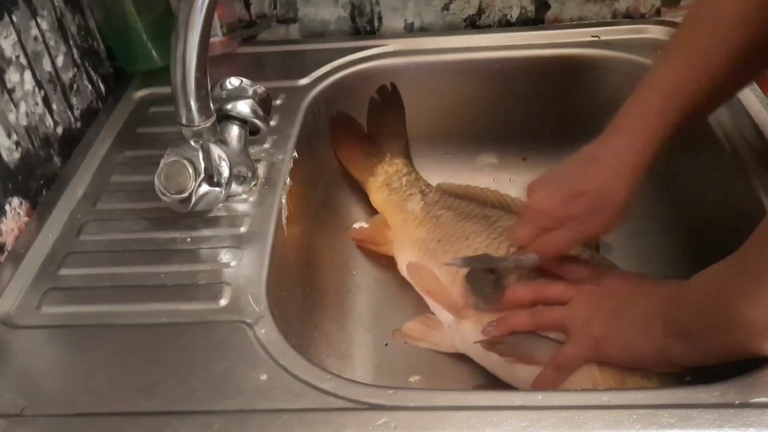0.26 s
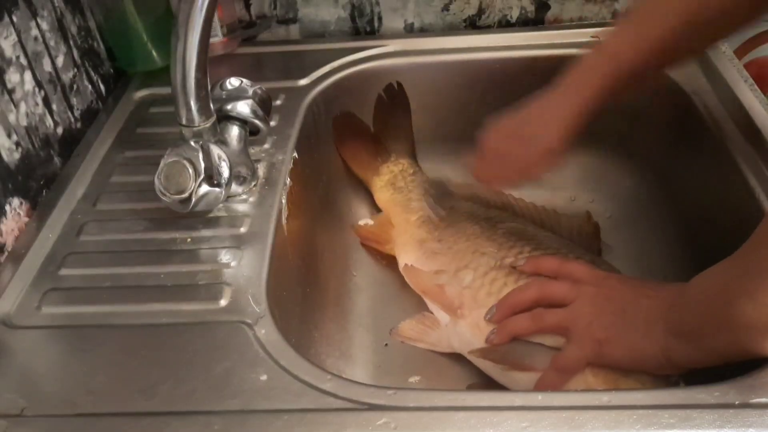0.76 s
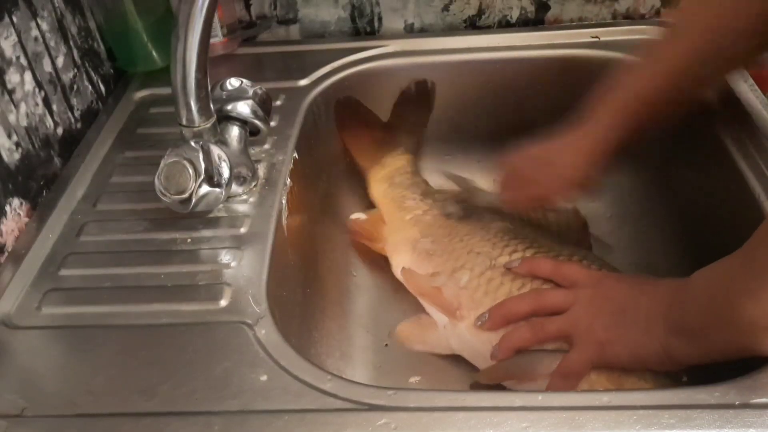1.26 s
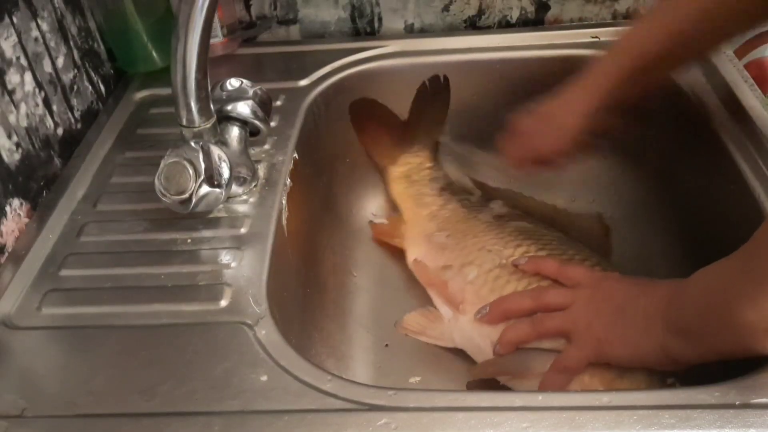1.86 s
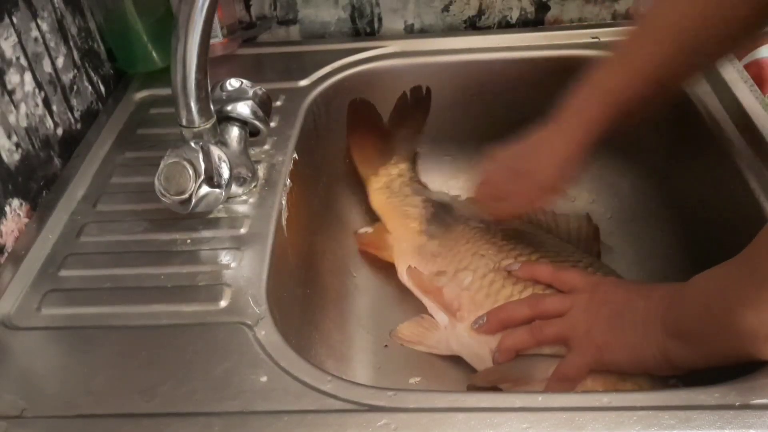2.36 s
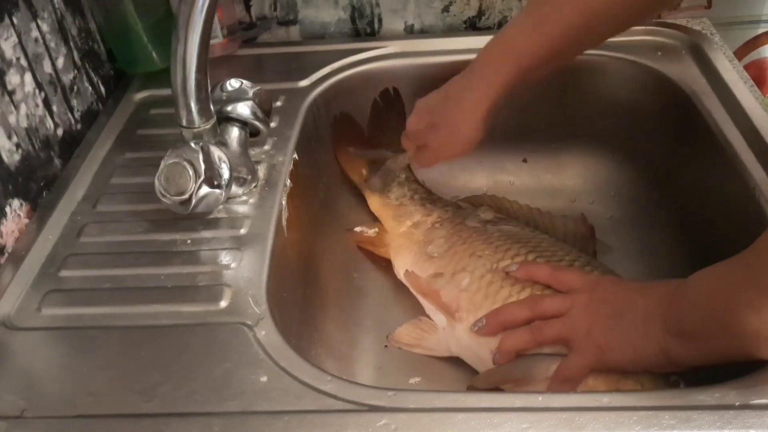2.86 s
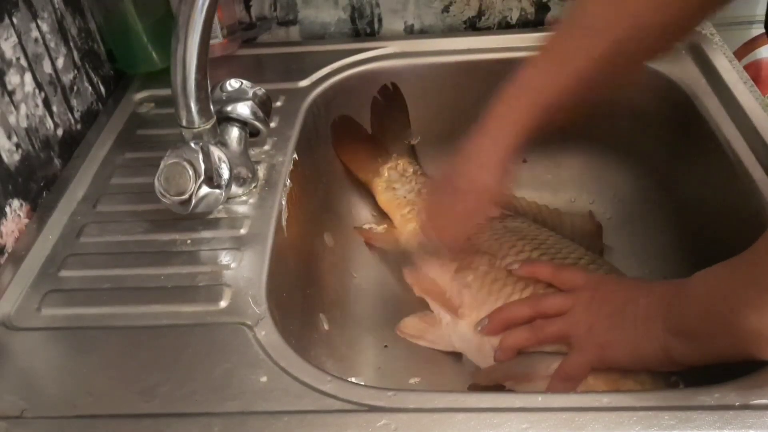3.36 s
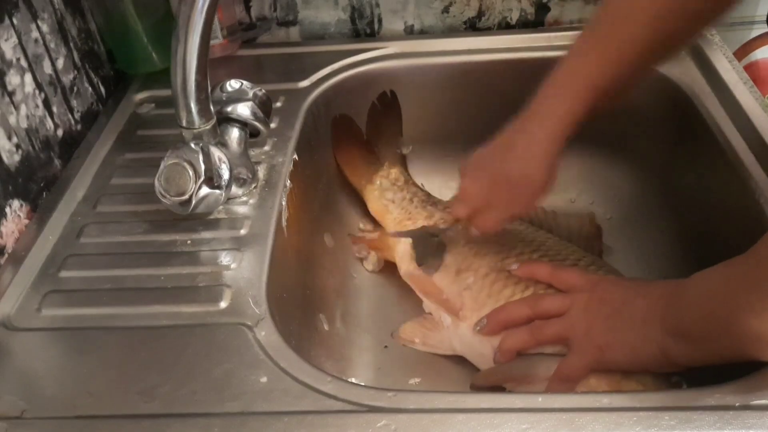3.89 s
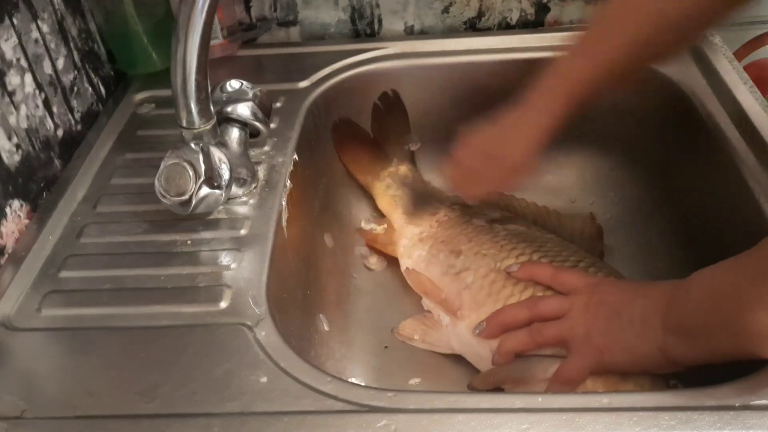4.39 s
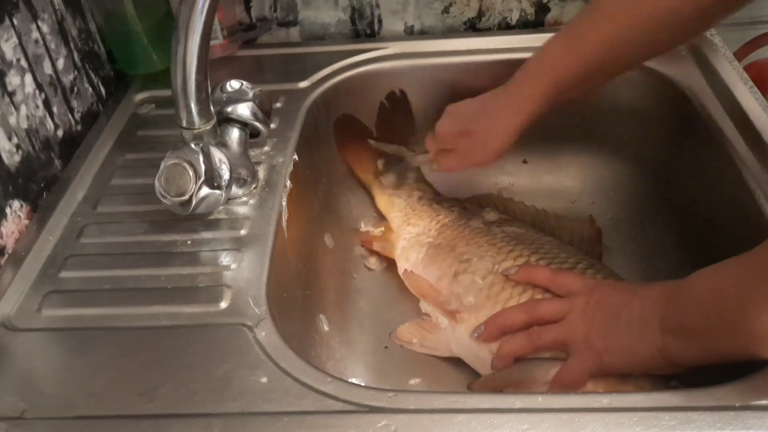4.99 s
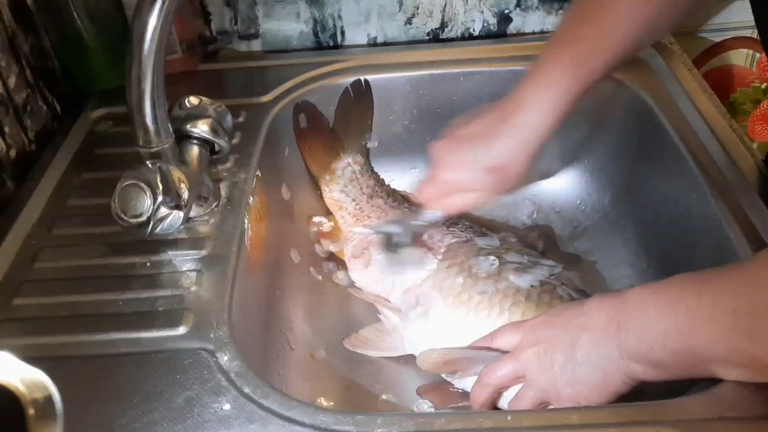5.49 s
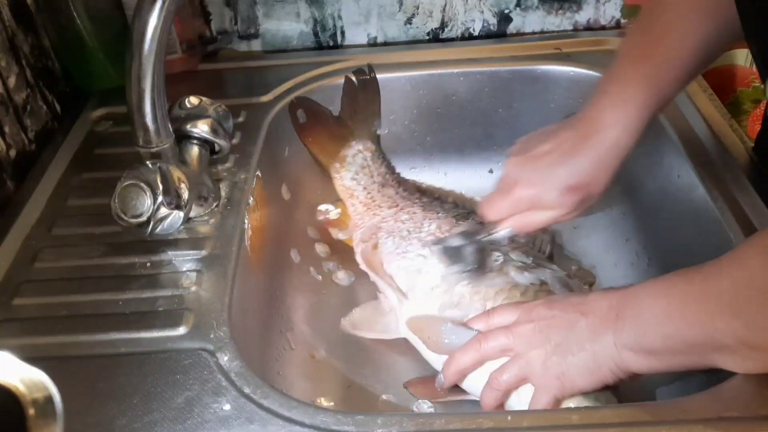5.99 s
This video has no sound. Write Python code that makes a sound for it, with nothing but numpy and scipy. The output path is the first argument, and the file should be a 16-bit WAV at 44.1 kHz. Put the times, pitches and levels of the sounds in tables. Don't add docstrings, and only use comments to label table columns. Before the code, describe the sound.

A blade rasps scales off a fish in a steel sink, about three crisp strokes a second, the basin thudding softly beneath each push.

```python
import sys
import numpy as np
from scipy import signal
from scipy.fft import rfft, irfft, next_fast_len
from scipy.io import wavfile
from scipy.ndimage import uniform_filter1d

SR = 44100
rng = np.random.default_rng(int(sys.argv[2]) if len(sys.argv) > 2 else 0)


def materialize(psi):
    bounded = np.clip(np.atleast_2d(psi).T, -1, 1)
    quanta = np.round(bounded * 32767).astype(np.int16)
    wavfile.write(sys.argv[1], SR, quanta)


def ratio(d):
    e = np.asarray(d, float) / 20
    return 10 ** e


N = 275625
TIME = np.arange(N) / SR
QUIETER_FROM_S = 5.8
QUIETER_DB = -4.5

# bite_s, drag_s, rasp_db at the end of the drag, rub_db of the fish, close_in_s
STROKES = [(0.136, 0.11, -29.5, -38.5, 0.045), (0.519, 0.14, -26, -37.5, 0.034),
           (0.885, 0.081, -28.5, -42, 0.03), (1.246, 0.068, -26.5, -40.5, 0.03),
           (1.603, 0.056, -30, -44, 0.051), (2.015, 0.045, -24, -33.5, 0.14),
           (2.34, 0.076, -25.5, -42.5, 0.042), (2.632, 0.098, -28.5, -44, 0.022),
           (2.937, 0.069, -25, -37.5, 0.048), (3.2, 0.061, -25, -37.5, 0.021),
           (3.52, 0.063, -23.5, -34.5, 0.044), (3.795, 0.082, -26, -37.5, 0.02),
           (4.105, 0.074, -23.5, -36, 0.033), (4.41, 0.075, -24, -34.5, 0.038),
           (4.708, 0.1, -24.5, -36, 0.012), (5.085, 0.061, -23.5, -33.5, 0.084),
           (5.605, 0.073, -27.5, -36.5, 0.034), (5.939, 0.1, -30, -44, 0.062)]
# start_s,
# rasp_db, rub_db, close_in_s
BRUSHES = [(0.0, -38.5, -43, .02), (0.327, -40, -44.5, 0.085), (1.03, -35, -37, 0.057),
           (1.119, -39.5, -44, 0.082), (1.53, -50, -48, 0.061), (1.75, -47, -47.5, 0.082),
           (1.926, -27, -56, 0.0052), (2.099, -28.5, -39, 0.11), (5.009, -52, -40.5, 0.022),
           (5.245, -61, -60, 0.051), (0.257, -36, -37, .06), (0.727, -40.5, -56, 0.037),
           (1.5, -49, -51, 0.13), (2.455, -36.5, -58, 0.09), (2.592, -51, -63, 0.035),
           (3.469, -47, -60, .01), (3.614, -35, -37.5, 0.047), (3.76, -56, -66, 0.013),
           (3.92, -33.5, -45, 0.055), (4.57, -50.5, -50, .06), (5.195, -38.5, -64, 0.058),
           (5.87, -52, -45, .04), (6.144, -46.5, -60, .06), (0.862, -46, -60, .012), (1.34, -36, -50, .03),
           (5.557, -52, -64, .02), (4.051, -45.5, -66, 0.013), (0.052, -43.5, -63, 0.03),
           (0.46, -54.5, -66, 0.048), (4.665, -50, -49, .015), (5.407, -36.5, -43, 0.042),
           (5.789, -44.5, -41.5, 0.064)]
# time_s, hiss_db
DAMP = [(0.1, -75), (0.42, -70), (0.83, -65), (1.2, -58), (1.44, -58), (1.87, -62), (2.26, -62),
        (2.56, -75), (2.87, -68), (3.13, -60), (3.43, -65), (3.74, -68), (4.03, -71), (4.35, -65),
        (4.63, -73), (4.97, -66), (5.31, -78), (5.54, -56.5), (5.85, -58), (6.2, -64)]
# time_s, blade_ring_db re rasp
GRIP = [(0.2, -21), (0.65, -6.5), (0.93, -6), (1.28, -13), (1.63, -9.5), (2.05, -8.5), (2.39, -11.5),
        (2.72, -6), (2.98, -11), (3.24, -6), (3.56, -9.5), (3.85, -5), (4.16, -10), (4.45, -8), (4.8, -5),
        (5.12, -7.5), (5.41, -3), (5.52, -3), (5.65, 2.5), (5.94, 1), (6.08, -7)]


def stroke_levels():
    moves = list(STROKES) + [(s, 0, db, rub_db, close) for s, db, rub_db, close in BRUSHES]
    edge = [(s, drag, db, close) for s, drag, db, _, close in moves]
    rub = [(s, drag, rub_db, close) for s, drag, _, rub_db, close in moves]
    damp_db = np.interp(TIME, *np.transpose(DAMP))
    rub_rest_db = -58 + QUIETER_DB * (TIME > QUIETER_FROM_S)
    rasp_db = effort(edge, bite_db=-7, release_db_s=263, rest_db=damp_db)
    ring_db = effort(edge, bite_db=-10, release_db_s=340, rest_db=-74)
    ring_db = ring_db + np.interp(TIME, *np.transpose(GRIP))
    body_db = effort(rub, bite_db=-2.5, release_db_s=140, rest_db=rub_rest_db)
    return rasp_db, ring_db, body_db


def effort(events, bite_db, release_db_s, rest_db):
    step = 16
    close_in_db, lift_db, lift_s = -30, -6.5, 0.0063
    t, power = TIME[::step], 0
    for s, drag, db, close in events:
        since_lift = t - s - drag
        before = bite_db * (drag > 0) + close_in_db * (s - t) / close
        during = -bite_db * since_lift / max(drag, 1e-6)
        after = -release_db_s * since_lift + lift_db * np.clip(since_lift / lift_s, 0, 1)
        shape = np.where(t < s, before, np.where(since_lift < 0, during, after))
        power = power + ratio(2 * np.maximum(db + shape, -200))
    return 10 * np.log10(np.interp(TIME, t, power) + ratio(2 * rest_db))


# freq_hz, density_db per Hz
RASP = [(350, -47), (600, -23.5), (849, -0.5), (1030, -23), (1170, -10), (2000, -9.5), (2800, -3.5),
        (3350, -1), (6610, -0.5), (9480, -1.5), (14000, -2), (15800, -1), (16500, -43)]
# freq_hz, width_hz, level_db
BLADE = [(2400, 700, -4), (2880, 163, 8.5)]
# time_s, share_db, tilt_db
ANGLE = [(0.2, -2.5, 0.1), (0.6, -6, 5), (0.93, 1, -0.5), (1.28, 0, -3), (1.63, -5, -0.5), (2.05, -2, -3),
         (2.39, -1.1, -3), (2.69, 0, 3), (2.98, -6, -1), (3.24, 0, -0.5), (3.56, -8, 3), (3.85, -4, 0.6),
         (4.15, -3, 1), (4.45, -4.8, -3), (4.77, -1, -0.7), (5.12, -2.5, -3), (5.65, -5.5, -2.3),
         (6.0, 0.5, -0.3)]
# freq_hz, width_hz
SHEEN = [(5600, 3800), (13000, 3400)]
# time_s, level_db re rasp
DIG = [(0.2, -10.5), (0.62, -13), (0.95, -10), (1.28, -14.5), (1.63, -16.5), (2.05, -11), (2.4, -13),
       (2.7, -11), (2.98, -13.5), (3.24, -15), (3.56, -17), (3.85, -19), (4.15, -17.5), (4.46, -12),
       (4.78, -10), (5.12, -6.5), (5.65, -12), (6.0, -13.5)]


def rasp(rasp_db, blade_db):
    beat = (clicks(500, 0.97, 0.0021) + 2.3) * (clicks(90, 3.5, 0.004) + 2.5)
    grit = level(pair((N,), 0.062) * beat, -1.4)
    noise = pair((N,), 0.036)

    flecks = 0
    for hz in np.geomspace(1300, 14000, num=11):
        patches = (clicks(30, 5.2, 0.0073) + 0.46) * ratio(2.4 * walk(25))
        flecks = flecks + ring(noise * patches, [(hz, hz / 2.3, 0)]) / np.sqrt(hz)

    sheen = 0
    s, share_db, tilt_db = np.transpose(ANGLE)
    for sign, (hz, width) in zip((-1, 1), SHEEN):
        swell = ratio(np.interp(TIME, s, share_db + sign * tilt_db) + 2 * walk(30))
        band = [(hz, width, 0)]
        hiss = ring(ring(pair((N,), 0.1) * beat, band), band)
        sheen = sheen + swell * level(hiss, -8)

    dig = ratio(np.interp(TIME, *np.transpose(DIG))) * level(ring(noise * beat, [(1580, 1870, 0)]), 0)
    blade = ring(pair((N,), 0.64) * clicks(150, 0.62, 0.013), BLADE) * ratio(0.5 * walk(22))
    friction = level(colour(grit + level(flecks, -5), RASP), -4)
    return ratio(rasp_db) * (friction + sheen + dig + ratio(blade_db) * level(blade, -3.5))


# start_s, peak_db, pitch_hz, ring_db re crack
BITES = [(0.1303, -18.5, 3720, -3), (0.1458, -14.5, 7300, -6), (0.5062, -34, 7600, 7),
         (0.5196, -13, 6100, -5), (0.8779, -24, 8700, 7), (1.2412, -7.5, 3950, -6), (1.6015, -13, 5660, -3),
         (2.0093, -28, 8350, 10), (2.336, -30.5, 5740, 3), (2.6234, -24.5, 12000, 2),
         (2.9312, -28, 5500, 5), (2.9463, -17, 3370, -8), (3.1996, -24, 7700, 3), (3.4994, -47, 5960, 21),
         (3.5262, -8.5, 6140, 0), (3.7897, -43, 6240, -10), (3.8063, -22.5, 3060, -11),
         (4.0952, -32, 5300, -14), (4.1209, -19.5, 5400, 0), (4.3928, -40, 1910, 11),
         (4.7047, -65, 4120, -4), (5.0977, -26, 4870, 14), (5.5925, -38, 2620, -16), (5.6101, -32, 2940, 8),
         (5.9239, -35, 2750, 13), (5.937, -25.5, 2740, 12.5)]
SNAPS = [(0.1685, -6.5, 1770, -3.5), (0.192, -11.5, 6600, -1.5), (0.555, -9.5, 5750, -2),
         (0.5896, -16, 4120, 1), (0.6342, -10.5, 2680, -3), (0.6629, -10.5, 2490, 4),
         (0.9295, -10.5, 4030, 0), (0.9522, -10.5, 3680, -2), (1.314, -16.5, 5750, -9),
         (2.034, -10, 8200, 5), (2.1007, -16, 5000, 8.5), (2.4077, -24.5, 7360, 6),
         (2.6535, -24.5, 5840, 10), (2.673, -7, 6300, 1), (2.699, -9.5, 3000, -0.5),
         (2.7357, -23, 2880, 13), (2.961, -10.5, 8940, -0.5), (2.9861, -10, 2880, -3),
         (3.2249, -16, 3000, 4), (3.834, -10, 3000, -2), (4.1682, -29.5, 2950, 19.5),
         (4.4725, -18, 4700, 10), (4.7735, -12, 5060, 6.5), (4.8081, -8.5, 4260, 3),
         (5.1425, -14, 2650, -20), (5.9868, -17, 2200, 5.5), (6.0083, -20, 11500, 9)]
FLICKS = [(1.0166, -8.5, 2340, -14), (1.035, -8.5, 4200, -11), (1.1097, -8.5, 1960, -5),
          (1.5218, -16, 1900, 2), (1.584, -44, 11300, 22), (1.7443, -23, 6500, 4.5), (1.922, 3, 1550, 2),
          (3.142, -32, 2000, 6), (3.1503, -11, 1750, 1.5), (4.6539, -26.5, 5950, -1),
          (4.999, -19.5, 5430, 9), (4.9995, -26.5, 1960, 12), (5.3493, -30, 5730, 12.5),
          (5.3497, -26, 2120, 11.5), (5.405, -25.5, 2270, 5), (5.7846, -22, 6260, 1)]
POPS = [(0.193, -1.5, 6700, 7), (0.506, -24, 13000, 7), (2.72, -12, 2880, 2), (4.15, -22, 2830, 5),
        (5.061, -22, 3980, 4), (2.108, -9, 5000, 5), (2.407, -5, 7900, 5), (0.87, -26, 8000, 1.5),
        (1.258, -12, 6000, 4), (4.792, -13, 6000, 3), (3.895, -17, 6500, 1.5), (0.912, -17, 2300, 3),
        (2.35, -17, 5000, 1.5), (5.66, -19, 5000, 1.5), (6.035, -20, 5500, 3), (4.74, -16, 4200, 3),
        (3.575, -16, 3800, 3), (0.68, -17, 4500, 1.5), (2.28, -37, 12000, 3), (2.295, -36, 11000, 9),
        (2.545, -31, 12500, 3), (2.904, -25, 11900, 5), (3.466, -34, 13300, 8), (3.515, -12, 6780, 8),
        (3.757, -36, 12900, 5), (3.776, -30, 13600, 1), (4.458, -18, 5400, 3), (4.703, -24, 12500, 17),
        (5.23, -32, 5000, 11), (5.255, -32, 4500, 6), (5.39, -28, 13000, 7), (3.231, -14, 7260, 9),
        (2.3246, -16.5, 14900, 4)]


def snaps():
    crack, tone, t = np.zeros((2, N)), np.zeros((2, N)), TIME[:3072]
    kinds = ((BITES, 0.1), (SNAPS, 0.048), (FLICKS, 0.028), (POPS, 0.0079))  # table, t60_s
    scales = [(*row, t60) for rows, t60 in kinds for row in rows]
    noise = pair((len(scales), 2, len(t)), 0.022)
    for k, (s, db, hz, ring_db, t60) in enumerate(scales):
        shape = (fade(t, t60) + 0.14 * fade(t, 0.0015)) * np.minimum(t / 0.001, 1)
        broad = shape * noise[:, k, 0]
        add(crack, s, ratio(db) * (1.055 * broad + ring(broad, [(hz, min(2.4 * hz, SR / 3), 3)])))
        narrow = ring(shape * noise[:, k, 1], [(hz, hz / 10.5, 0)])
        add(tone, s, ratio(db + ring_db) * level(narrow, 0) * np.sqrt(np.mean(shape ** 2)))
    coloured = level(colour(crack, RASP), 0) * np.std(crack)
    return ratio(-19) * coloured + ratio(-14) * tone


# start_s, peak_db
TINGS = [
    (0.255, -33),
    (0.3032, -55),
    (0.3194, -37),
    (0.3344, -41.5),
    (3.657, -42),
]
# freq_hz, level_db, t60_s
EDGE = [(2950, -8, 0.05), (4120, -11, 0.04), (6560, -7, 0.079), (7900, -7.5, 0.045), (9800, -9, 0.05),
        (13900, -8, 0.064), (15100, -12, 0.06)]
# start_s, peak_db
LANDINGS = [
    (1.0149, -26),
    (1.111, -40),
    (1.5206, -33),
    (3.151, -28),
    (4.655, -48),
    (4.998, -24.5),
    (5.35, -37.5),
    (5.778, -36),
]
# freq_hz, level_db, t60_s
KNIFE = [(1826, -11.5, 0.028), (2016, -6, 0.019), (4970, -25, 0.027), (5950, -19, 0.027)]


def knife():
    out, t = np.zeros((2, N)), TIME[:3072]
    rough = 0.51 + 0.8 * uniform_filter1d(pair(t.shape, 0.2), size=60) * np.sqrt(60)
    for s, db in TINGS:
        add(out, s, ratio(db + 17.5) * rough * struck(EDGE, t) * np.minimum(t / 0.0015, 1))
    for s, db in LANDINGS:
        add(out, s, ratio(db + 16.5) * rough * struck(KNIFE, t))
    return ratio(-14) * out


# freq_hz, width_hz, level_db
BODY = [(314.4, 23.5, 4.5), (366.1, 16.2, 4), (415, 47.4, -4), (540, 620, -19), (950, 12, -27)]


def rubbing(body_db):
    scrub = pair((N,), 0.62) * (clicks(200, 0.53, 0.0094) + 0.41)
    return level(ring(scrub, BODY), -0.35) * ratio(body_db)


# peak_s, peak_db, pitch_hz, t60_s
SHOVES = [(0.136, -30.5, 158, 0.067), (0.175, -35, 156, 0.1), (0.212, -27, 143, 0.14),
          (0.544, -12.5, 134, 0.19), (0.565, -21, 137, 0.12), (0.923, -21, 141.3, 0.16),
          (1.275, -23.5, 137, 0.081), (1.311, -34, 143, 0.07), (1.62, -20.5, 137.4, 0.17),
          (2.005, -24.5, 139, 0.11), (2.049, -19.5, 148, 0.15), (2.382, -17.5, 138, 0.092),
          (2.654, -19, 137, 0.14), (2.727, -24, 145.4, 0.18), (2.965, -21, 138, 0.048),
          (2.998, -26, 145.6, 0.22), (3.227, -21, 169, 0.029), (3.262, -29, 163, 0.11),
          (3.544, -22, 149, 0.13), (3.596, -28, 138, 0.091), (3.811, -21.5, 145, 0.026),
          (3.852, -20, 150, 0.024), (3.884, -22, 129, 0.051), (4.126, -19, 143, 0.093),
          (4.188, -27, 138, 0.072), (4.434, -15, 147, 0.097), (4.737, -20, 159.6, 0.15),
          (5.068, -23, 150, 0.15), (5.092, -16.5, 159.4, 0.16), (5.116, -17.5, 155, 0.17),
          (5.63, -41, 135, 0.13), (5.67, -35, 139, 0.14), (5.95, -44, 139, 0.13), (5.185, -33, 144, 0.03),
          (1.49, -43, 129, .1),
    (1.86, -44, 130, .1),
    (3.2, -36, 140, 0.055),
    (2.186, -30, 142, 0.083),
    (5.424, -34.5, 62.4, 0.15),
]
# peak_s, peak_db
WALL = [(0.151, -38.5), (0.532, -28.5), (1.271, -35.5), (2.044, -41), (2.372, -32.5), (2.694, -31),
        (2.97, -28.5), (3.543, -39.5), (3.843, -31.5), (4.137, -26.5), (4.45, -33), (4.748, -32.5),
        (5.115, -33)]
# peak_s, upper_db, lower_db, t60_s
ROCKS = [(0.213, -40, -26, 0.2), (0.31, -33, -32, 0.28), (0.531, -37, -55, .1), (0.66, -29.5, -53, .27),
         (0.967, -34, -57, 0.089), (1.04, -57, -34.5, 0.22), (1.28, -38, -34.5, 0.25),
         (1.63, -38, -36, 0.28), (2.018, -32, -55, .2), (2.086, -29, -29, 0.11), (2.396, -46, -57, .12),
         (2.724, -30, -48, 0.31), (2.979, -29.5, -50, 0.24), (3.04, -53, -42, 0.23),
         (3.273, -52, -24, 0.17), (3.534, -26.5, -50, 0.21), (3.628, -33, -37, 0.24),
         (3.88, -30, -32, 0.26), (4.188, -21, -20, 0.19), (4.816, -28, -25.5, 0.25),
         (5.101, -32, -52, 0.24), (5.671, -41, -27.5, 0.035), (5.964, -30.5, -50, 0.31),
         (6.01, -45, -33.5, .073)]
# freq_hz, width_hz, level_db
DRUM = [(66, 20.2, 0), (97, 30.6, 0.5), (138, 61.7, 0.5)]


def basin(rasp_db):
    shoves, t = np.zeros(N), TIME[:SR // 2]
    wall = [(s, db, 228.8, 0.19) for s, db in WALL]
    upper = [(s, db, 96.2, t60) for s, db, _, t60 in ROCKS]
    lower = [(s + 0.0064, db, 67, t60) for s, _, db, t60 in ROCKS]
    for s, db, hz, t60 in [*SHOVES, *wall, *upper, *lower]:
        rise = 1.346 / hz + 0.01094
        push = np.sin(np.pi / 2 * np.minimum(t / rise, 1)) ** 2
        swell = push * fade(np.maximum(t - rise, 0), max(t60, 0.03))
        add(shoves, s - rise, ratio(db + 0.5) * swell * np.sin(2 * np.pi * hz * t))
    rumble = level(ring(ring(rng.standard_normal(N), DRUM), DRUM), -12)
    quieter_db = -7 * (TIME > QUIETER_FROM_S)
    return shoves + rumble * ratio(0.74 * rasp_db + quieter_db)


# start_s, peak_db
KNOCK = [
    (1.923, -5),
]
# freq_hz, level_db, t60_s
STEEL = [(368, -3, 0.13), (394, 0.5, 0.17), (480.5, -1.5, 0.25), (670, -12, 0.089), (828, -4.5, 0.19),
         (743, -13, 0.09), (1194, -11, 0.097), (1285, -12, 0.089), (1560, -9, 0.17), (1491, -16, 0.083),
         (1900, -12, 0.13), (2140, -13, 0.076), (2296, -6, 0.11), (2600, -6.5, 0.079)]


def knock():
    out, t = np.zeros((2, N)), TIME[:SR // 2]
    low = signal.lfilter(*signal.iirpeak(330, 2.5, SR), pair(t.shape, 0.97)) * fade(t, 0.23)
    clang = signal.lfilter(*signal.iirpeak(2000, 0.7, SR), pair(t.shape, 0.37)) * fade(t, 0.052)
    right_t = np.maximum(t - 0.00025, 0)
    modes = np.array([struck(STEEL, t) * ratio(3), struck(STEEL, right_t) * ratio(-2)])
    rough = 1 + 0.26 * uniform_filter1d(pair(t.shape, 0.5), size=200) * np.sqrt(200)
    hit = ratio(-9.5) * rough * modes + ratio(1) * low + ratio(-6) * clang
    for s, db in KNOCK:
        add(out, s, ratio(db) * np.minimum(t / 0.0023, 1) * hit)
    return out


def echoes(x, room_db, room_t60):
    t = TIME[:SR // 2]
    tail = rng.standard_normal((2, len(t))) * fade(t, room_t60)
    tail = ratio(room_db) * tail / np.linalg.norm(tail[0])
    return x + signal.fftconvolve(x, tail, axes=1)[:, :N]


# freq_hz, density_db per Hz
KITCHEN = [(18, -30), (30, -24), (132, 4.5), (248, 4.5), (323, -22), (519, -9), (1030, -13), (2810, -15),
           (13400, -50), (15200, -45.5), (16500, -47)]
# freq_hz, width_hz, level_db
HUM = [(129, 36, -73), (309, 9.8, -64.5)]


def kitchen():
    mid, side = colour(rng.standard_normal((2, N)), KITCHEN)
    side = signal.sosfilt(signal.butter(2, 400, "high", fs=SR, output="sos"), side)
    air = level(np.array([mid + side, mid - side]), -62)
    hum = sum(level(ring(rng.standard_normal(N), [(hz, width, 0)]), db) for hz, width, db in HUM)
    return air + hum


def level(x, db):
    return x * ratio(db) / np.sqrt(np.mean(x ** 2))


def colour(x, table):
    hz, db = np.transpose(table)
    size = next_fast_len(N)
    f = np.maximum(np.arange(size // 2 + 1) * SR / size, 1)
    gain = ratio(np.interp(np.log(f), np.log(hz), db))
    return irfft(rfft(x, size) * gain, size)[..., :N]


def ring(x, modes):
    return sum((-1) ** k * ratio(db) * signal.lfilter(*signal.iirpeak(hz, hz / width, SR), x)
               for k, (hz, width, db) in enumerate(modes))


def struck(modes, t):
    return sum(ratio(db) * fade(t, t60) * np.sin(2 * np.pi * hz * t) for hz, db, t60 in modes)


def fade(t, t60):
    return np.exp(-np.log(1000) * t / t60)


def clicks(rate, spread_db, tail_s):
    size_db = spread_db * np.minimum(rng.exponential(size=N), 4)
    slips = (rng.random(N) < rate / SR) * ratio(size_db)
    return signal.lfilter([1], [1, -np.exp(-1 / (tail_s * SR))], slips)


def walk(rate):
    k = int(SR / rate)
    held = np.repeat(rng.standard_normal(N // k + 1), k)
    return 1.75 * uniform_filter1d(held, k)[:N]


def pair(shape, alike):
    mid, side = rng.standard_normal((2,) + shape)
    return np.array([np.sqrt(1 + alike) * mid + sign * np.sqrt(1 - alike) * side for sign in (1, -1)])


def add(track, s, x):
    i = max(int(s * SR), 0)
    track[..., i:i + x.shape[-1]] += x[..., :N - i]


def lean(db):
    return ratio(np.array([[db], [-db]]))


def scene():
    rasp_db, ring_db, body_db = stroke_levels()
    bright = (rasp(rasp_db, ring_db - rasp_db) + snaps() + knife()) * lean(0.6)
    solid = rubbing(body_db) * lean(1.4) + knock()
    drum = basin(rasp_db) * lean(1.1)
    air = kitchen() * ratio(QUIETER_DB * (TIME > QUIETER_FROM_S))
    return echoes(bright + solid, room_db=-6.5, room_t60=0.19) + drum + air


def band_limit(x):
    return signal.sosfilt(signal.butter(12, 16970, fs=SR, output="sos"), x)


# freq_hz, left_over_right_db
EARS = [(40, -2.3), (125, 1.2), (400, .6), (1000, 2.5), (2000, 0.8), (4000, -1), (8000, -1.5), (13000, 1.8)]
# freq_hz, width_hz, level_db taken out
WORKTOP_DIP = [(58.3, 4.3, 3)]
# freq_hz, width_hz, level_db taken out
MIC_DIP = [(9560, 1130, -6)]


def record(dry):
    ears = [colour(ear, [(hz, sign * db / 2) for hz, db in EARS]) for ear, sign in zip(dry, (1, -1))]
    dry = np.array(ears)
    dipped = dry - ring(dry, WORKTOP_DIP) - ring(dry, MIC_DIP)
    x = signal.sosfilt(signal.butter(3, 42, "high", fs=SR, output="sos"), dipped)
    x = 1.741 * np.tanh(x / 1.472)
    x = signal.sosfilt(signal.ellip(8, 0.2, 42, 15900, fs=SR, output="sos"), x)
    return band_limit(x)


dry = scene()
out = record(dry)
materialize(out)
```